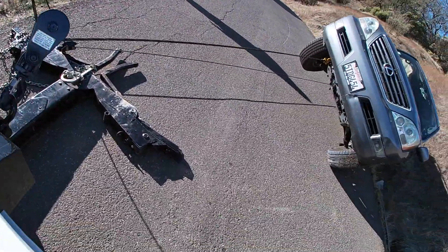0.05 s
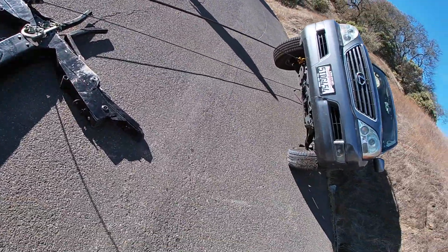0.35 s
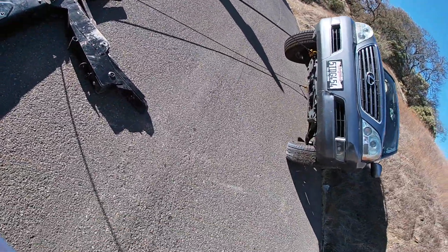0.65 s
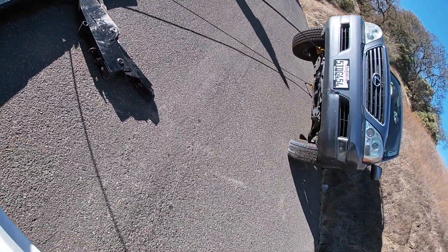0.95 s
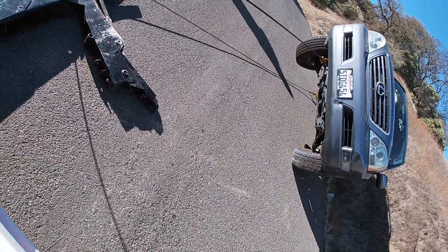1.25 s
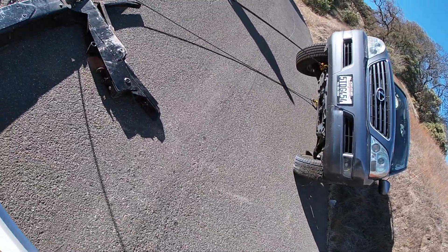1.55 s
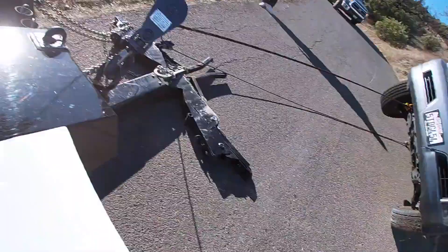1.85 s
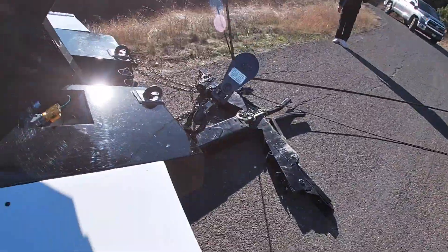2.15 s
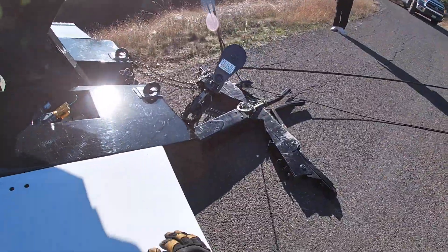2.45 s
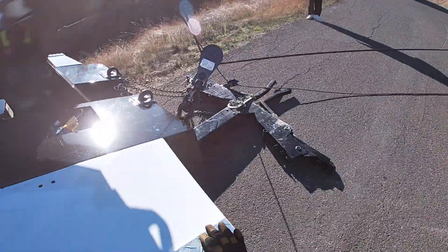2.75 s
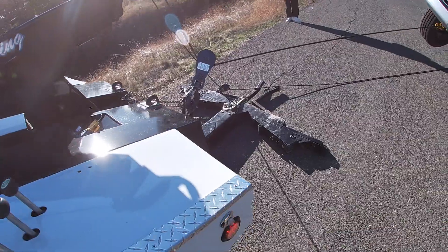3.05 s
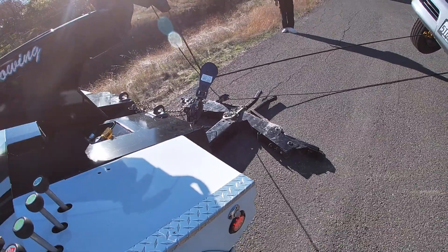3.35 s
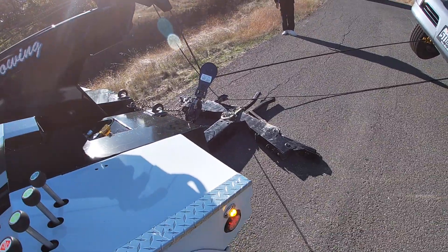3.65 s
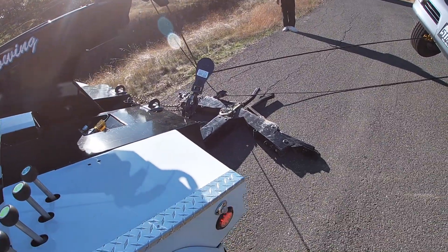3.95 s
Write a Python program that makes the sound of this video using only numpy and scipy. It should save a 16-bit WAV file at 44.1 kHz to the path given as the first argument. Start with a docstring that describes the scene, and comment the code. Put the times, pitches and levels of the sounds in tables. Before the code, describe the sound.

A tow truck's winch cable slides with a high, wavering squeal, pauses, then creaks in rapid, squeaky metallic pulses. The creaking stops and wind briefly bumps the microphone, while the idling engine and hydraulic hum grow louder outdoors.

```python
"""A tow truck's winch cable slides under load with one wavering squeal over a low judder.
After a pause it creaks at about 22 slips a second; each slip knocks the steel rigging, rasps and squeals.
The last slips add falling squawks and stop near 3 s, then wind buffets the microphone.
Throughout, the engine idles and the hydraulic pump hums, both louder late on as the microphone
turns towards the truck."""
import sys
import numpy as np
from scipy import signal
from scipy.fft import rfft, irfft
from scipy.io import wavfile
from scipy.ndimage import map_coordinates

SR = 44100
rng = np.random.default_rng(int(sys.argv[2]) if len(sys.argv) > 2 else 0)


def generate_wav(signal):
    """Clip the signal to [-1, 1] and save it as 16-bit WAV at the path in sys.argv[1]."""
    frames = np.transpose(np.atleast_2d(signal))
    scaled = np.clip(frames, -1, 1) * 32767
    pcm = np.round(scaled).astype(np.int16)
    wavfile.write(sys.argv[1], SR, pcm)


N = 176400
T = np.arange(N) / SR

# cable slips: start_s, squeal_db
SLIPS = [(0.581,-21.5),(.955,-47),(1.006,-23),(1.046,-14.5),(1.092,-13.5),(1.137,-13),(1.185,-14),(1.23,-16),(1.274,-15),(1.317,-14.5),(1.362,-14),(1.408,-16),(1.451,-16),(1.494,-16),(1.531,-21),(1.579,-21),(1.626,-25),(1.671,-26),(1.713,-24),(1.755,-20.5),(1.802,-21),(1.849,-26),(1.895,-24.5),(1.937,-21.5),(1.981,-23),(2.026,-22),(2.069,-22.5),(2.115,-21.5),(2.163,-28.5),(2.204,-25.5),(2.248,-25),(2.293,-22.5),(2.339,-21.5),(2.386,-22.5),(2.432,-23),(2.477,-23.5),(2.522,-25),(2.567,-27),(2.611,-26.5),(2.654,-27.5),(2.699,-29.5),(2.742,-31.5),(2.788,-33.5),(2.831,-27.5),(2.877,-30.5),(2.921,-29),(2.974,-25)]
# cable grip: time_s, squeal_hz, roughness, low_mode_hz, chatter_rasp_db, low_mode_db, second_mode_db
GRIP = [(.58,5215,0.03,1387,-15,-21,-23.5),(.96,5050,0,1660,-13,-21,-18),(1.0,5050,0.37,1710,-16.5,-22,-22),(1.05,5355,0,1745,-18,-26,-23),(1.25,5364,0.02,1810,-20.5,-54,-28),(1.48,5344,0,1870,-17,-54,-26),(1.62,5090,.8,1730,-11,-40,-20.5),(1.78,4893,0.12,1680,-11.5,-25,-12.5),(2.25,4837,0.03,1578,-9.5,-22,-24),(2.56,4916,0.24,1664,-11,-16.5,-19.5),(2.7,5105,0.3,1730,-15.5,-17,-27),(2.9,4930,0.2,1760,-17,-22.5,-26)]
# rasp spectrum: freq_hz, level_db
RASP_COLOUR = [(1200,0),(2100,11.5),(3500,-4.5),(4900,11.5),(6700,-4),(8000,-7.5),(9000,7.5),(12000,-46)]


def creak():
    """Stick-slip: each slip knocks, rasps while the cable moves, and squeals."""
    out, rasp_env = np.zeros(N), np.zeros(N)
    t = T[:SR // 10]
    hold_s, release_s = 0.023, 0.026
    rasp_decay = np.exp(-t / 0.029 - np.maximum(t - hold_s, 0) / release_s)
    for start_s, squeal_db in SLIPS:
        hz, rough, low_hz, chatter_db, low_db, second_db = curve(GRIP, start_s)
        if 2.55 < start_s < 2.95:
            add(out, start_s + 0.011, squawk())
        add(out, start_s, knock(low_hz, chatter_db, low_db, second_db))
        tone, octave = squeal(hz, squeal_db + 3, rough, length_s=0.03, swell=2, octave_db=-35)
        add(out, start_s + 0.001, tone + octave)
        add(rasp_env, start_s, undb(chatter_db - 19) * rasp_decay)
    return out + rasp_env * noise(RASP_COLOUR)


def squeal(hz, db, rough, length_s, swell, octave_db):
    """Friction tone and its octave. Firm grip locks the tone's pitch; poor grip lets it sag into grit."""
    size, grit_hz, ring_s = 6000, 600, 0.019
    t = T[:size]
    drive = arch(t, length_s)
    pole = np.exp(-1 / (ring_s * SR))
    env = drive ** swell + 0.45 * signal.lfilter([1 - pole], [1, -pole], drive)
    jitter = 0.012 * rough * walk(grit_hz, size)
    sag = 0.065 * (1 - drive) ** 2
    bend = (jitter - sag) * np.clip((length_s - t) / 0.0036 + 1, 0, 1)
    give = min(2 * np.sqrt(rough), 1)
    phase = phase_of(hz * (1 + give * bend))
    grit = walk(grit_hz, size) * np.sin(phase) + walk(grit_hz, size) * np.cos(phase)
    wave = np.sqrt(2 * (1 - rough)) * np.sin(phase) + np.sqrt(rough) * grit
    tone = undb(db) * env / env.max() * wave
    # octave: always bends, no ring-out, grows more slowly than the tone
    octave = undb(octave_db + 0.39 * db) * np.sqrt(2 * drive) * np.sin(2 * phase_of(hz * (1 + bend)))
    return tone, octave * (1 + np.sqrt(rough) * walk(grit_hz, size))


# rigging modes: freq_hz, level_db, t60_s
RIGGING_MODES = [(2613,-11.5,0.086),(3034,-12.5,0.077),(3310,-21.5,0.15),(4130,-11.5,0.1),(4850,-8,0.2),(6684,-12,0.11),(7530,-17.5,0.11)]


def knock(low_hz, chatter_db, low_db, second_db):
    """The cable lets go: two modes follow its tension, and a short chatter rings the rigging."""
    second_hz = 2185 + 0.65 * (low_hz - 1640)
    firm = undb(low_db) * ring(low_hz, t60_s=0.061) + undb(second_db) * ring(second_hz, t60_s=0.06)
    size = len(firm)
    chatter = 0.045 * rng.standard_normal(size) * np.exp(-T[:size] / 0.0057)
    chatter[0] += 1  # release impulse
    modes = [undb(db) * ring(hz, t60_s) for hz, db, t60_s in RIGGING_MODES]
    rigging = sum(np.std(mode) * unit(signal.fftconvolve(mode, chatter)[:size]) for mode in modes)
    return firm + undb(chatter_db - 9.5) * rigging


def ring(hz, t60_s, attack_s=0.0007):
    """One struck mode, slightly detuned at each blow."""
    t = T[:SR // 5]
    detune = 1 + 0.012 * rng.standard_normal()
    env = (1 - np.exp(-t / attack_s)) * undb(-60 * t / t60_s)
    return env * np.sin(2 * np.pi * hz * detune * t)


# linked slides, each lasting until the next: start_s, top_pitch_hz, level_db, roughness
SLIDES = [(0.048,5080,-27,0.35),(0.086,5226,-17,0.37),(.13,5210,-16,0),(.17,5156,-18.5,0.34),(0.212,5060,-16.5,0.59),(.26,5080,-16.5,0.11),(.302,5120,-18,0.8),(0.348,5150,-17,0.64),(0.396,5170,-18,0.67),(0.444,5340,-12,0.07),(0.48,5320,-11.5,0.01),(0.534,5286,-14.5,0.06)]
# judder harmonics 1 and 2: start_db, end_db
GROAN_LEVELS = [(-29,-27),(-32.5,-25)]
# rubbing spectrum: freq_hz, level_db
RUB_COLOUR = [(290,0.5),(520,-2),(3500,-26.5),(12000,-29.5)]


def slide():
    """The cable runs on: arcs of squeal, shaken by a judder that also groans, over rub and rasp."""
    judder_hz, judder_span_s, last_end_s = 262, (0.05, 0.485), 0.575
    out, rasp_env = np.zeros(N), np.zeros(N)
    phase = phase_of(judder_hz * (1 + 0.018 * walk(120)))
    ends_s = [row[0] for row in SLIDES[1:]] + [last_end_s]
    for (start_s, hz, db, rough), end_s in zip(SLIDES, ends_s):
        length_s, depth = end_s - start_s, 1.2 * rough
        tone, octave = squeal(hz, db, 0.2 * rough, length_s, swell=0.8, octave_db=-35 + 10 * rough)
        judder = np.sin(phase[int(start_s * SR):][:len(tone)])
        shake = (1 + depth * judder) / np.sqrt(1 + depth ** 2 / 2)
        add(out, start_s, tone * shake + octave)
        rasp_env += undb(db - 20.5) * rough * arch(T - start_s, length_s)
    gate = np.clip(np.minimum(T - judder_span_s[0], judder_span_s[1] - T) / 0.1 + 0.5, 0, 1)
    groan = sum(undb(np.interp(T, judder_span_s, db) + 2 * walk(90)) * np.sin(k * phase)
                for k, db in enumerate(GROAN_LEVELS, 1))
    rub = undb(-29) * noise(RUB_COLOUR)
    return out + gate * (groan + rub) + rasp_env * noise(RASP_COLOUR)


def squawk(length_s=0.027, start_hz=2240, fall_hz_per_s=15700, grit_hz=600):
    """Rough tone that falls as the cable slows; pitch and strength differ each time."""
    t = T[:int(length_s * SR)]
    scatter = 1 + 0.04 * (rng.standard_normal() + walk(grit_hz, len(t)))
    hz = (start_hz - fall_hz_per_s * t) * scatter
    grain = (0.5 + rng.random()) * (1 + 0.5 * walk(grit_hz, len(t)))
    return undb(-31.5) * grain * arch(t, length_s) * np.sin(phase_of(hz))


# scrapes: start_s, length_s, level_db
SCRAPES = [(.036,0.041,-26.5),(.41,0.041,-33.5),(2.413,0.044,-23.5)]
# scrape spectrum: freq_hz, level_db
SCRAPE_COLOUR = [(600,-9),(4500,-19.5),(12000,-38.5)]


def scrapes():
    """Short swells of noise with a gritty flutter."""
    return swells(SCRAPES) * noise(SCRAPE_COLOUR) * undb(2 * walk(430))


# engine speed: time_s, firing_hz
ENGINE_SPEED = [(0,54),(.9,50.4),(3.0,49.8),(3.3,49.8),(4,48.8)]
# truck nearness: time_s, firing_gain_db, hum_gain_db, clatter_gain_db
NEARNESS = [(.45,-4,-2.5,-2.5),(.7,-8,-3,0),(1.4,-8.5,-5.5,-2.5),(2.45,-7.5,-1.5,6),(2.8,-0.5,2.5,7),(3.1,-2,2,2),(4,-1.5,2,5)]
# pump-shaft hum near 90 Hz, low idle hum tones, faint whine near 1 kHz: firing_multiple, level_db
ENGINE_TONES = [(1.79,-31),(2,-27.5),(2.5,-31),(3,-25.5),(3.5,-25.5),(4,-29),(4.5,-41),(20.5,-53.5)]
# exhaust boom spectrum: freq_hz, level_db
BOOM_COLOUR = [(20,-29),(35,1),(65,4.5),(95,10.5),(120,4.5),(180,12),(215,10),(260,-5),(500,-56)]
# clatter spectrum: freq_hz, level_db
CLATTER_COLOUR = [(140,-4),(471,-4.5),(1350,-18),(5790,-34),(12200,-50)]


def engine():
    """Idle: firing tone, hum and faint whine, exhaust boom, and clatter that pulses at each firing."""
    phase = phase_of(curve(ENGINE_SPEED, T)[0] * (1 + 0.00468 * walk(12)))
    firing_gain, hum_gain, clatter_gain = undb(curve(NEARNESS, T))

    def tone(k, db, waver_db):
        level = np.sqrt(2) * undb(db + waver_db * walk(11))
        return level * np.sin(k * phase + 2 * np.pi * rng.random() + 0.15 * np.log(k) * walk(14))

    tones = sum(tone(k, db, waver_db=1) for k, db in ENGINE_TONES)
    boom = undb(-28) * noise(BOOM_COLOUR)
    clatter = undb(-37.5) * noise(CLATTER_COLOUR) * (1 + 0.12 * np.cos(phase))
    firing = tone(0.99, db=-23.5, waver_db=0.5)
    return firing_gain * firing + hum_gain * (tones + boom) + clatter_gain * clatter


# hydraulic pump: time_s, stroke_hz, second_harmonic_db
PUMP = [(.62,232,-42.5),(.88,232,-41),(1.15,223.3,-43.5),(2.7,225.2,-36.5),(3.2,231.5,-44)]


def pump(fall_db_per_harmonic=7.5):
    """Hydraulic hum: harmonics 2-5 of the stroke rate, which rises when the load comes off."""
    stroke_hz, db = curve(PUMP, T)
    phase = phase_of(stroke_hz * (1 + 0.0029 * walk(10)))
    return np.sqrt(2) * sum(undb(db - fall_db_per_harmonic * (k - 2) + walk(10)) * np.sin(k * phase)
                            for k in range(2, 6))


# wind buffet: start_s, length_s, level_db
BUFFETS = [(3.08,0.48,-29)]


def wind():
    """A gust rumbles on the microphone."""
    return swells(BUFFETS) * noise([(22, -5), (80, 4), (300, -48), (2000, -88)])


def undb(db):
    return 10 ** (np.asarray(db) / 20)


def unit(x):
    """Scale to rms 1."""
    return x / np.sqrt(np.mean(x ** 2))


def phase_of(hz):
    return 2 * np.pi * np.cumsum(hz) / SR


def curve(rows, t):
    """Table columns interpolated at times t."""
    times, *columns = np.array(rows).T
    return [np.interp(t, times, column) for column in columns]


def noise(colour):
    """Unit-rms noise from rows of freq_hz, level_db; rolls off below the first."""
    hz, db = np.array(colour, float).T
    f = np.fft.rfftfreq(N, 1 / SR) + 1
    gain = undb(np.interp(np.log(f), np.log(hz), db)) * np.minimum(f / hz[0], 1) ** 2
    return unit(irfft(rfft(rng.standard_normal(N)) * gain, N))


def walk(rate_hz, size=N):
    """Smooth random wander, spread near 1."""
    positions = np.arange(size) * rate_hz / SR
    return map_coordinates(rng.standard_normal(4096), [positions], order=2, mode="wrap")


def arch(t, length_s):
    """Half a sine from 0 to length_s."""
    return np.sin(np.pi * np.clip(t / length_s, 0, 1))


def swells(rows):
    return sum(undb(db) * arch(T - start_s, length_s) for start_s, length_s, db in rows)


def add(out, start_s, x):
    i = max(int(start_s * SR), 0)
    out[i:i + len(x)] += x[:N - i]


def scene():
    """All sources, alike in both channels."""
    mix = scrapes() + wind() + creak() + slide() + engine() + pump()
    return np.array([mix, mix])


def record(dry, edge_hz=10800, mirror_hz=24000, top_hz=15850):
    """Narrow-band recorder: the treble ends early and is faintly mirrored above its edge."""
    band = signal.sosfilt(signal.ellip(8, 0.3, 45, edge_hz, fs=SR, output="sos"), dry)
    treble = signal.sosfilt(signal.butter(8, 8500, "highpass", fs=SR, output="sos"), band)
    upper_band = signal.butter(6, (12800, 14700), "bandpass", fs=SR, output="sos")
    mirror = signal.sosfilt(upper_band, 2 * treble * np.cos(2 * np.pi * mirror_hz * T))
    lowpass = signal.ellip(8, 0.2, 70, top_hz, fs=SR, output="sos")
    return signal.sosfilt(lowpass, band + undb(-15) * mirror)


dry = scene()
out = record(dry)
generate_wav(out)
```